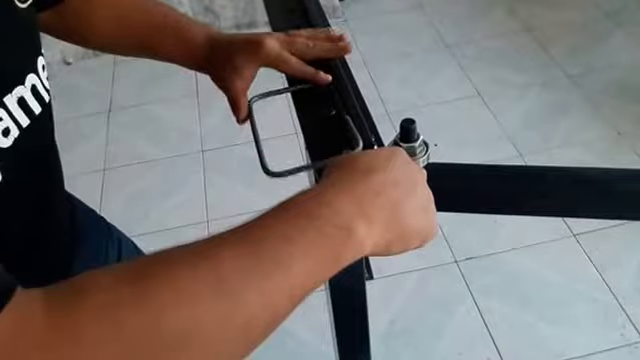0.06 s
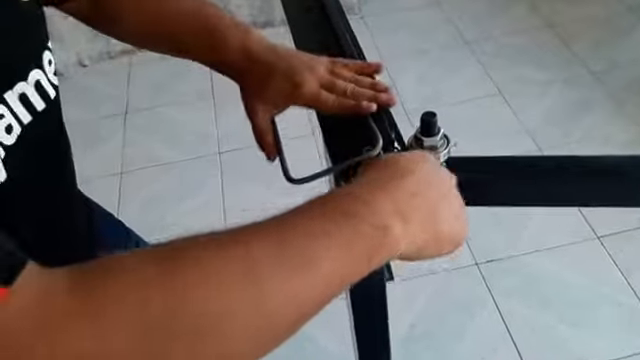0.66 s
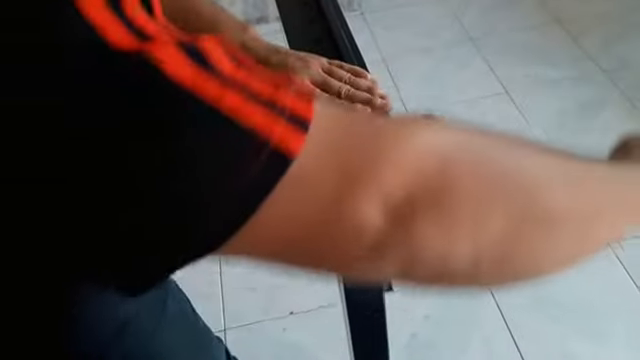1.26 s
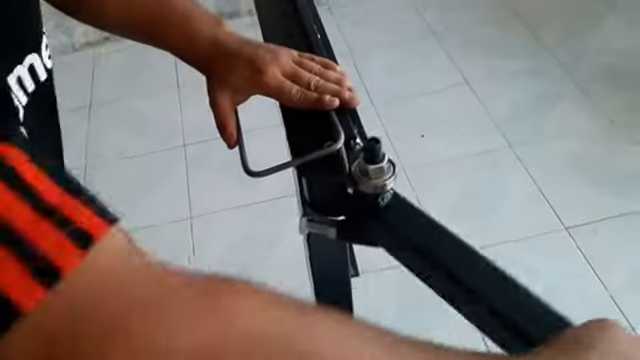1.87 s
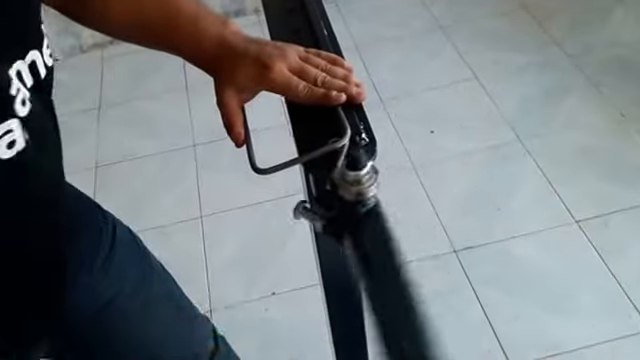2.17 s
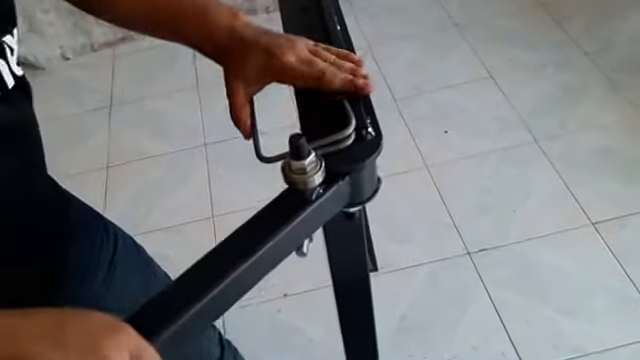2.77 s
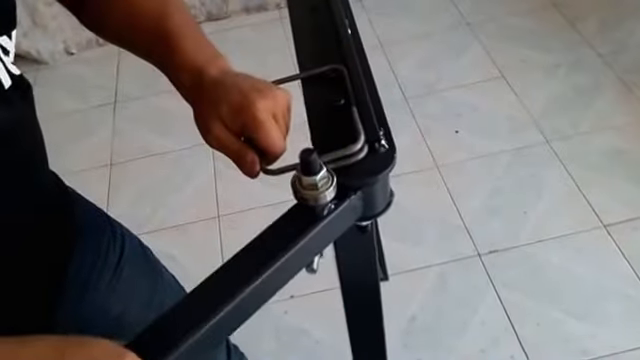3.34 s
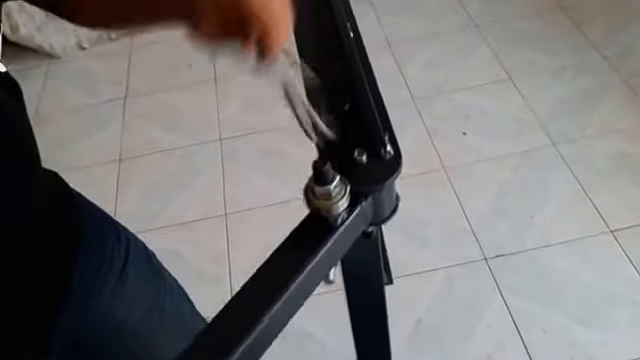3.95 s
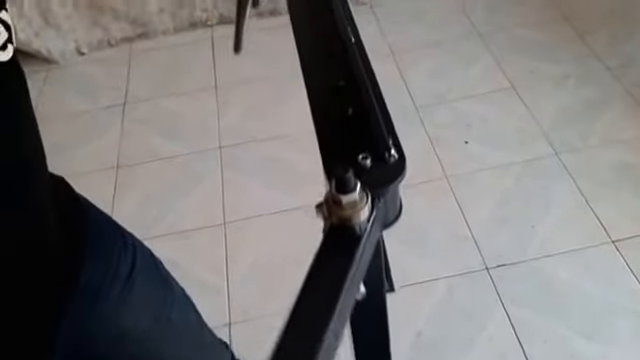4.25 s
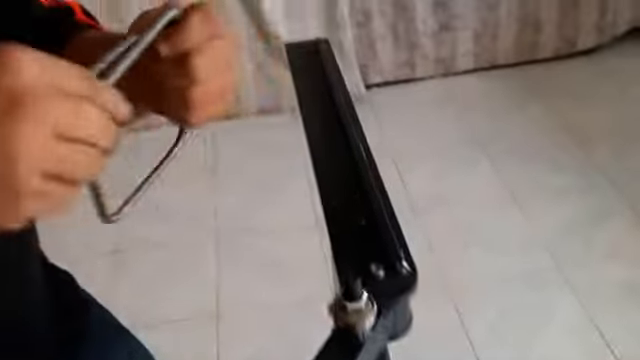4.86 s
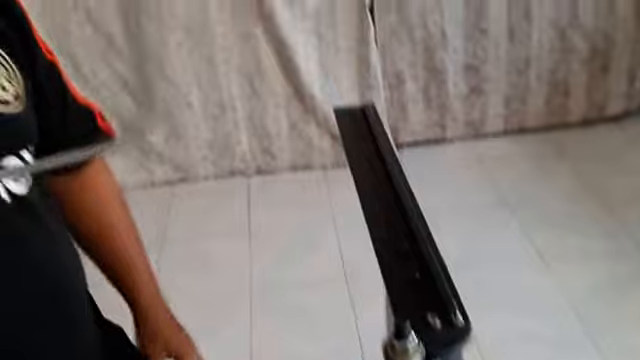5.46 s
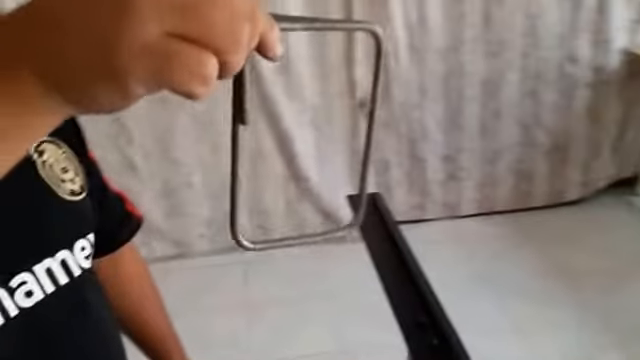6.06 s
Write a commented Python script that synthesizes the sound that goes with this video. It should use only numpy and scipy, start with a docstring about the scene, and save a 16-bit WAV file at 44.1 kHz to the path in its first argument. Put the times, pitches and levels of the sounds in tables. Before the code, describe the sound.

A steel rod is worked in a hand-lever bender, close and centred, in a quiet tiled room with a short echo. During the first second it clinks lightly with tiny squeaks and scrapes, and the lever knocks twice near 0.8 seconds. A firmer knock comes at 1.8, with faint ticks as the rod shifts and a short scrape near 2.7. At 3.4 the rod springs loose with a bright ring. A hard knock follows at 3.5, a ringing clank of the steel bench at 3.7, and the loudest knock at 3.9. The bent loop immediately jangles and scrapes free, ringing until about 4.3. Faint taps and scrapes trail off. One sharp, dry tick sounds at 5.5, and a hand rubs softly near the microphone around 5.8 to 6. A very faint low boom swells with the work.

```python
"""A steel rod is bent into a square loop on a hand-lever bender in a hard, tiled room.
First the rod clinks, squeaks and scrapes against the pins while the lever knocks in its pivot
and a low room boom swells with the work. The rod shifts as it bends, springs loose, and the steel
bench clanks. Near four seconds the finished loop is pulled free, jangling. One sharp tick follows,
and at the end a hand rubs close to the microphone as the loop is held up."""
import sys
import numpy as np
from scipy import signal
from scipy.fft import rfft, irfft, next_fast_len
from scipy.io import wavfile
from scipy.ndimage import map_coordinates

SR = 44100
rng = np.random.default_rng(int(sys.argv[2]) if len(sys.argv) > 2 else 0)


def int16_out(signal):
    """Quantize to a 16-bit WAV file."""
    q = np.round(np.clip(np.atleast_2d(signal).T, -1, 1) * 32767)
    wavfile.write(sys.argv[1], SR, q.astype(np.int16))


N = 269892
RING_SAMPLES = int(0.8 * SR)


def amp(db):
    """Decibels to gain."""
    return 10 ** (np.asarray(db) / 20)


def unit(x):
    """Scale to rms 1."""
    return x / np.sqrt(np.mean(x ** 2) + 1e-20)


def along(points, hz):
    """Read a curve of (Hz, value) points on a log axis."""
    f, v = np.transpose(points)
    return np.interp(np.log(hz + 1), np.log(f + 1), v)


def peaks(resonances, f):
    """Gain of (Hz, half-width in Hz, dB) resonances."""
    return sum(amp(db) / (1 + ((f - hz) / width) ** 2) for hz, width, db in resonances)


def wobble(rate):
    """A smooth random curve, rate knots a second."""
    return map_coordinates(rng.standard_normal(int(N * rate / SR) + 4), [np.arange(N) * rate / SR])


def filtered(x, response):
    """Equalise x with a gain that depends on frequency."""
    n = x.shape[-1]
    m = next_fast_len(n + 8192)
    return irfft(rfft(x, m) * response(np.fft.rfftfreq(m, 1 / SR)), m)[..., :n]


def noise(colour, size=N):
    """Noise of rms 1. Each row of a colour: frequency in Hz, level in dB."""
    return unit(filtered(rng.standard_normal(size), lambda hz: amp(along(colour, hz))))


def add(track, s, sound):
    """Mix a sound in at s seconds."""
    i = max(round(s * SR), 0)
    track[..., i:i + sound.shape[-1]] += sound[..., :N - i]


def swell(s, length, fade_db_per_s):
    """Vibration builds up for length seconds, then dies away."""
    t = np.arange(N) / SR - s
    return np.sqrt(np.clip(t / length, 0, 1)) * amp(-fade_db_per_s * np.maximum(t - length, 0))


def strokes(table, fade_db_per_s):
    """One envelope for each dB column of (start, length, dB, ..) rows; overlaps add in power."""
    power = np.array([swell(s, length, fade_db_per_s) ** 2 for s, length, *_ in table])
    return np.sqrt(amp(np.array(table)[:, 2:].T) ** 2 @ power)


def ambience():
    """Quiet room tone, almost alike in both ears."""
    # The room's hum and hiss. Each row: frequency in Hz, level in dB.
    colour = [(12, -28.5), (20, -7), (32, -36.5), (70, -2.5), (127, 2.5), (285, -5.5), (337, -6),
              (410, -7.5), (590, -10), (949, -11), (1060, -12.5), (4670, -30.5), (6720, -36), (7520, -38),
              (16000, -33.5)]
    mid, side = noise(colour), amp(-15) * noise(colour)
    return amp(-65) * np.array([mid + side, mid - side])


def room_tail(colour, t):
    """Diffuse ringing between the tiles; the treble dies first."""
    # Reverb time. Each row: frequency in Hz, t60 in seconds.
    reverb = [(200, 1), (1000, 0.69), (2200, 0.94), (6000, 0.67), (12000, 0.48)]
    hz, s, spectrum = signal.stft(noise(colour, size=len(t)), SR, nperseg=256)
    decay = amp(-60 * s / along(reverb, hz)[:, None])
    return signal.istft(spectrum * decay, SR, nperseg=256)[1][:len(t)]


def spread(x, side_db):
    """Wall reflections reach the two close microphone ports slightly differently."""
    t = np.arange(SR // 8) / SR
    walls = rng.standard_normal(len(t)) * np.exp(-t / 0.138)
    side = amp(side_db) * signal.fftconvolve(x, walls / np.linalg.norm(walls))[:N]
    side = filtered(side, lambda hz: amp(along([(100, 4), (1000, 0), (5000, -3), (8000, -20)], hz)))
    return np.array([x + side, x - side])


def ringing(modes, t):
    """Decaying modes, struck at a new spot each time; each has a weaker twin that beats with it."""
    hz, db, t60 = np.transpose(modes)[:, :, None]
    size = amp(db + rng.standard_normal(hz.shape))
    phase, twin_phase = rng.uniform(0, 2 * np.pi, (2,) + hz.shape)
    twin_hz = hz + 10 * rng.uniform(-1, 1, hz.shape)
    t = np.float32(t)
    sine = lambda f, start: np.sin(np.float32(2 * np.pi * f) * t + np.float32(start))
    pair = sine(hz, phase) + .4 * sine(twin_hz, twin_phase)
    decay = np.exp(np.maximum(np.float32(-np.log(1000) / t60) * t, -20))
    return (np.float32(size) * decay * pair).sum(0) / np.sqrt(np.sum(size ** 2) / 2)


def voiced(x, band_db, start):
    """Equalise a blow to its balance of bands, setting its level just after start."""
    # Presence, bass, body, brightness and air. Each row: lower and upper edge in Hz.
    bands = [(1600, 3300), (200, 700), (700, 1600), (3500, 7600), (8000, 15000)]
    first = round(start * SR)
    head, early = x[first:first + round(.014 * SR)], x[:round(.09 * SR)]
    hz, power = signal.periodogram(early, SR, window=("tukey", .1))
    power = power / power.sum() * np.mean(head ** 2)
    curve = []
    for (lo, hi), want_db in zip(bands, band_db):
        boost_db = want_db - 10 * np.log10(power[(hz > lo) & (hz < hi)].sum() + 1e-20)
        curve += [(lo * 1.15, boost_db), (hi / 1.15, boost_db)]
    return filtered(x, lambda f: amp(along(sorted(curve), f)))


def blows(hits, modes, colour, modes_db, tail_db, chatter, gain_db, bass_db, air_db):
    """Steel on steel: a brief chatter of contact, then the modes and the room ring out.
    Each hit: start in seconds, presence in dB, body and brightness in dB against it,
    contact time in seconds, ring-out in dB. Each mode: pitch in Hz, level in dB, t60 in seconds.
    The colour is the dense ringing around the modes. Each row: frequency in Hz, level in dB."""
    out, t = np.zeros(N), np.arange(RING_SAMPLES) / SR
    # While the parts touch, the modes are damped to broad humps that colour chatter and echo alike.
    grid = np.arange(0, SR / 2, 10)
    humps = np.max([peaks([(hz, 25 + hz / 150, db / 2)], grid) for hz, db, _ in modes], axis=0)
    for s, db, body_db, bright_db, contact, ring_db in hits:
        contact = max(contact, .002)
        burst = noise(colour, size=len(t)) * np.exp(-t / (chatter * contact + 0.0073))
        echo = amp(ring_db + tail_db) * room_tail(colour, t)
        dense = filtered(burst + echo, lambda f: .5 + 1.3 * np.interp(f, grid, humps))
        attack = 1 - np.exp(-(2 * t / contact) ** 2)
        blow = (dense + amp(ring_db + modes_db) * ringing(modes, t)) * attack
        balance_db = np.array([0, body_db + bass_db, body_db, bright_db, bright_db + air_db])
        add(out, s, voiced(blow, db + balance_db, contact / 2))
    return amp(gain_db) * out


def room_boom(gain_db, pitch_hz, rise_s):
    """One low room mode, slightly unsteady in pitch, swells with the work and dies away."""
    # Swells of the boom. Each row: start in seconds, relative level in dB.
    swells = [(-0.1, -67), (0.72, -73), (1.8, -62.5), (3.45, -70), (3.88, -60), (4.21, -68), (5.95, -71)]
    envelope, = strokes([(s, rise_s, db) for s, db in swells], fade_db_per_s=55.5)
    phase = 2 * np.pi * pitch_hz * np.arange(N) / SR + .6 * wobble(5.3)
    return amp(gain_db) * envelope * unit(np.sin(phase))


def hand_rub(rustle_db, squeak_db, rough_db, waver_db):
    """Skin drags in small slips: a dull rustle and thin resonances above it, which swell by turns."""
    # Hand strokes. Each row: start and length in seconds, rustle and squeak in relative dB.
    rubs = [(5.764, 0.058, -55.5, -64.5), (5.915, 0.048, -51.5, -61)]
    # The rustle. Each row: frequency in Hz, level in dB.
    colour = [(59, -37), (100, -17), (291, 3), (550, -4.5), (595, 1), (1340, -8.5), (2270, -6), (3540, -23),
              (3840, -25), (4220, -23), (4500, -31), (5850, -54), (9900, -120)]
    # The squeak. Each row: pitch and half-width in Hz, level in dB.
    resonances = [(2220, 35, 2), (2590, 55, -2), (3500, 50, -6), (4170, 35, -4), (5340, 130, -10),
                  (5730, 30, -9), (5890, 35, -13), (6680, 90, -9), (7400, 90, -7), (7600, 40, -10),
                  (7800, 30, -12), (8280, 40, -17), (9035, 35, -13), (9650, 90, -22), (10275, 45, -10),
                  (11585, 40, -18), (12480, 40, -24), (13500, 45, -22)]
    rustle, squeak = strokes(rubs, fade_db_per_s=68)
    slips = unit(amp(rough_db * wobble(220)))
    thin = np.zeros(N)
    for k in range(3):
        waver = amp(waver_db * wobble(11))
        thin += waver * filtered(slips * rng.standard_normal(N), lambda f: peaks(resonances[k::3], f))
    return amp(rustle_db) * rustle * slips * noise(colour) + amp(squeak_db) * squeak * unit(thin)


def sharp_tick(gain_db, wet_db):
    """A single dry tick and the room's answer."""
    # The tick's cue: start in seconds, relative level in dB.
    cues = [(5.478, -35.5)]
    # Its colour. Each row: frequency in Hz, level in dB.
    colour = [(120, -30), (400, -10), (1200, -1), (2300, 0), (3200, -9), (6600, -11), (8500, -25),
              (15000, -26)]
    out, t = np.zeros(N), np.arange(RING_SAMPLES) / SR
    for s, db in cues:
        tick = noise(colour, size=len(t)) * np.exp(-t / 0.0024)
        echo = room_tail(colour, t) * (1 - np.exp(-t / 0.013))
        add(out, s, amp(db + gain_db) * (tick + amp(wet_db) * echo))
    return out


def rod_scrapes(grind_db, hiss_db, rough_db, sing_db):
    """The rod drags over the pins, catching unevenly, and sings at its resonances."""
    # Drags. Each row: start and length in seconds, grind and hiss in relative dB.
    drags = [(0.28, 0.045, -61, -75), (1.07, 0.033, -56, -71), (2.475, 0.018, -68, -66),
             (2.686, 0.068, -52.5, -58), (3.045, 0.02, -60.5, -60), (3.17, 0.018, -62, -65.5),
             (4.13, 0.088, -51, -48), (4.5, 0.026, -58, -82), (4.66, 0.086, -59.5, -93),
             (4.778, 0.027, -57, -62), (5.2, .04, -65, -76.5)]
    # Low grind and high hiss. Each row: frequency in Hz, level in dB.
    grind_colour = [(290, -30.5), (500, -8.5), (888, -2), (1070, -13), (2190, -2.5), (2370, -11),
                    (2590, -5), (4000, -34), (5200, -61), (8800, -120)]
    hiss_colour = [(1940, -39), (3300, -17.5), (4500, -12.5), (5100, -15.5), (6690, -9), (7540, -13.5),
                   (8050, -22), (15100, -25.5), (16000, -37.5)]
    # The rod's resonances. Each row: pitch and half-width in Hz, level in dB.
    singing = [(956, 10, -7), (2415, 14, -1.5), (5210, 88, 3), (6820, 90, -10.5)]
    grind, hiss = strokes(drags, fade_db_per_s=90.5)
    catch = unit(amp(rough_db * wobble(170)))
    drag = amp(grind_db) * grind * noise(grind_colour) + amp(hiss_db) * hiss * noise(hiss_colour)
    return filtered(catch * drag, lambda f: 1 + amp(sing_db) * peaks(singing, f))


def rod_squeaks(gain_db):
    """A slip on a pin excites one damped resonance of the ribbed rod; longer slips sing purer."""
    # Slips. Each row: start in seconds, relative level in dB, length in seconds, pitch in Hz.
    slips = [(0.139, -46, .016, 2620), (0.258, -48, .02, 2600), (0.425, -45, .014, 2550),
             (0.47, -52, .07, 1530), (0.731, -51, .016, 2600), (0.886, -49, .01, 2560),
             (1.064, -58, .018, 2560), (2.315, -54, .04, 2260), (3.18, -66, .1, 2260),
             (3.933, -32, .016, 2750)]
    out, t = np.zeros(N), np.arange(SR // 2) / SR
    for s, db, length, hz in slips:
        width = 2.5 / length + 30
        tone = unit(filtered(rng.standard_normal(len(t)), lambda f: peaks([(hz, width, 0)], f)))
        rise = 2 * t / length
        add(out, s, amp(db + gain_db) * tone * rise * np.exp(1 - rise))
    return out


def lever_knocks(wet_db):
    """The lever takes up the play in its pivot: a few well-damped modes and a little room."""
    # Each row: time in seconds, level in dB, pitch in Hz, longest t60 the grip allows in seconds.
    knocks = [(0.795, -32.5, 942, 0.12), (0.886, -32, 981, 0.106), (1.318, -40.5, 954, 0.21),
              (1.801, -26, 893, 0.085), (2.435, -43, 980, 0.19), (3.536, -20, 936, 0.028),
              (3.894, -15, 967, 0.019)]
    # The pivot's modes. Each row: multiple of the pitch, level in dB, t60 in seconds.
    pivot = [(1, -5, 0.45), (1.03, 3, 0.01), (1.29, -11, 0.12), (1.45, -1, 0.024), (2.1, 1, 0.01),
             (2.35, -15.5, 0.13)]
    echo_colour = [(300, -35.0), (750, -11.5), (930, -0.5), (1100, -15.5), (1350, -10.5),
                   (2200, -19.5), (4000, -44.5)]
    out, t = np.zeros(N), np.arange(RING_SAMPLES) / SR
    attack = 1 - np.exp(-(t / 0.002) ** 2)
    for s, db, pitch, ring in knocks:
        modes = [(ratio * pitch, level, min(t60, ring)) for ratio, level, t60 in pivot]
        echo = amp(wet_db) * np.sqrt(ring) * room_tail(echo_colour, t)  # long rings feed the room more
        add(out, s - .001, amp(db) * (ringing(modes, t) + echo) * attack)
    return out


def bench_clanks():
    """A faint ring as the rod scrapes, then one loud clank of the steel bench."""
    # The steel channel's cues, modes and dense ringing; rows as in blows().
    cues = [(2.685, -60.5, 1, -12, .004, -5), (3.691, -28, -3.5, -14, .005, -5)]
    modes = [(260, -23, 0.8), (299, -18, 0.57), (333, -13, 0.5), (379, -17, 0.58), (425, -13, 0.32),
             (583, -9, 0.53), (807, -11, 0.8), (830, -11, 0.55), (1116, -4, 0.4), (1139, -3, 0.52),
             (1180, -2, 0.31), (1202, -9, 0.59), (1223, -13, 0.8), (1240, -11, 0.79), (1608, -11, 0.52),
             (1704, -12, 0.8), (1756, -15, 0.8), (1785, -8, 0.79), (1815, -12, 0.67), (1965, -8, 0.8),
             (2257, -6, 0.78), (2289, -12, 0.8), (2354, -1, 0.35), (2389, 0, 0.39), (2498, -7, 0.25),
             (3163, -17, 0.8), (3302, -11, 0.38), (3714, -19, 0.45), (5111, -18, 0.45), (5161, -14, 0.33)]
    colour = [(120, -23), (250, -15.5), (340, -16), (480, -11.5), (700, -9.5), (1150, -5), (1450, -11),
              (2300, -8), (3200, -12.5), (4300, -16), (5200, -17), (7200, -23), (8200, -36.5),
              (16000, -58.5)]
    return blows(cues, modes, colour, modes_db=-2, tail_db=-4.5, chatter=1.2,
                 gain_db=0.5, bass_db=-7, air_db=-22.5)


def rod_clinks():
    """The rod clinks under the hand as it is set against the pins."""
    # The held rod's hits, modes and dense ringing; rows as in blows().
    hits = [(0.001, -48, -2, -5, 0.0041, -3), (0.141, -51, -6.5, -14.5, 0.0032, 7),
            (0.256, -48.5, -7.5, -7.5, 0.011, 31), (0.36, -47.5, -3.5, -8.5, 0.0022, 1.5),
            (0.423, -42, -5.5, -11.5, 0.0067, -7.5), (0.729, -56, -1.5, -9, 0.002, 15),
            (0.854, -49.5, -3.5, -13.5, 0.0027, -9), (0.884, -51, -2.5, -13.5, 0.0018, -3),
            (1.063, -67, -17, -12, 0.0052, -21)]
    modes = [(842, -9, .7), (890, -8, .7), (910, -6, .7), (960, -7, .7), (1479, 0, .75), (1500, -6, .7),
             (1560, -4, .7), (1623, -6, .6), (1690, -5, .7), (1815, -7, .6), (2089, -6, .6), (2109, -6, .6),
             (2228, 0, .7), (2254, -5, .6), (2483, -6, .4), (2571, -3, .4), (2589, -4, .4), (2975, -10, .4),
             (3767, -18, .3)]
    colour = [(71, -35), (120, -4.5), (167, -18), (524, -10.5), (569, -20), (617, -5.5), (911, -10),
              (1070, -1), (1520, -8.5), (1940, -8.5), (2240, -5.5), (3520, -15), (7200, -28.5), (7980, -45),
              (16000, -66)]
    return blows(hits, modes, colour, modes_db=-3, tail_db=-2, chatter=3.2,
                 gain_db=-2.5, bass_db=-9, air_db=-22)


def rod_bends():
    """Wedged by the lever, the rod shifts on the pins as it bends."""
    # The wedged rod's hits, modes and dense ringing; rows as in blows().
    hits = [(1.72, -44.5, -3.5, -6.5, 0.0014, -1.5), (1.8, -45.5, -3.5, -11.5, 0.0017, 3.5),
            (1.865, -59, 5, -10, 0.0072, 14), (1.942, -51, -7.5, -5, 0.021, 1.5),
            (2.15, -60, -1.5, -8, 0.0082, 0.5), (2.311, -56.5, -1.5, -11.5, 0.0058, -1),
            (2.474, -82, 0, 9, 0.0042, -17)]
    modes = [(857, -6, .5), (885, -3, .6), (908, -3, .6), (957, -9, .5), (1153, -4, .4), (1244, -6, .5),
             (1300, -5, .5), (1475, -9, .5), (1820, -4, .55), (1957, -4, .6), (1985, -6, .55),
             (2080, -7, .55), (2260, -6, .5), (2523, -8, .4), (2589, -8, .4), (4592, -17, .35),
             (5175, -7, .3), (6708, -17, .3), (10175, -21, .5), (10610, -15, .2)]
    colour = [(71, -24), (120, -17.5), (410, -28), (742, -12.5), (892, -21), (1010, -8), (1120, -10),
              (1680, -7), (1980, -10), (3740, -8), (5300, -6), (7350, -4.5), (8140, -13.5), (10400, -18),
              (16000, -29.5)]
    return blows(hits, modes, colour, modes_db=-13.5, tail_db=-6, chatter=2.4,
                 gain_db=1, bass_db=-12.5, air_db=-10)


def rod_springs():
    """The rod springs loose and rings freely."""
    # The sprung rod's hits, modes and dense ringing; rows as in blows().
    hits = [(3.355, -31, -12.5, -1.5, 0.011, -1.5), (3.64, -56.5, -1.5, 3, 0.0052, -12),
            (3.661, -41.5, -1.5, -6, 0.0018, -8)]
    modes = [(686, -19, 0.8), (857, -16, 0.8), (887, -16, 0.8), (904, -17, 0.8), (1323, -17, 0.8),
             (1497, -16, 0.8), (1916, -8, 0.68), (1945, -2, 0.59), (1962, -2, 0.78), (2095, -6, 0.8),
             (2159, -10, 0.69), (2208, -7, 0.58), (2262, -10, 0.64), (2524, -7, 0.55), (2552, -10, 0.49),
             (2583, 0, 0.42), (2650, -12, 0.63), (2778, -13, 0.68), (2973, -12, 0.53), (3572, -16, 0.74),
             (4089, -14, 0.6), (4274, -18, 0.6), (4845, -15, 0.55), (4983, -9, 0.4), (5173, 0, 0.42),
             (5587, -18, 0.6), (6047, -12, 0.37), (6288, -5, 0.35), (6925, -15, 0.43), (8705, -20, 0.42)]
    colour = [(71, -50.5), (120, -20.5), (222, -38), (321, -10.5), (362, -31), (557, -18.5), (643, -27.5),
              (698, -17), (1400, -6.5), (2020, -7.5), (3110, -9.5), (5300, -10), (7820, -13.5), (9020, -21),
              (16000, -33)]
    return blows(hits, modes, colour, modes_db=-3, tail_db=-3, chatter=1,
                 gain_db=-0.5, bass_db=-7, air_db=-13)


def loop_jangles():
    """The finished loop jangles as it is pulled free."""
    # The loop's hits, modes and dense ringing; rows as in blows().
    hits = [(3.931, -30, -8.5, -8, 0.0052, -0.5), (4.047, -31, -12.5, -4, 0.009, -4.5),
            (4.072, -28, -16.5, -2, 0.008, -5.5), (4.205, -44, -4.5, -11, 0.0016, 3.5),
            (4.468, -54, 0, -22, 0.0017, 4), (4.639, -60, 3.5, -22, 0.0059, -6),
            (5.076, -62, 0, -27, 0.003, -9.5), (5.236, -75, 9, -18.5, 0.003, -4)]
    modes = [(1686, -8, 0.78), (1814, -1, 0.58), (2038, -5, 0.8), (2069, -2, 0.8), (2103, -4, 0.8),
             (2123, -5, 0.8), (2149, -2, 0.8), (2223, -4, 0.59), (2258, 0, 0.8), (2339, -5, 0.66),
             (2560, -1, 0.45), (2702, -1, 0.49), (2775, -2, 0.42), (2899, -7, 0.76), (2929, -2, 0.6),
             (3005, -6, 0.79), (4338, -7, 0.52), (4628, -8, 0.51), (5000, -9, 0.59), (5111, -6, 0.56),
             (5170, -9, 0.49), (5476, -7, 0.52), (5792, -8, 0.57), (5888, -5, 0.45), (5913, -11, 0.57),
             (6473, -8, 0.44), (6738, -4, 0.54), (6957, -4, 0.51), (7079, -7, 0.43), (7288, -10, 0.46)]
    colour = [(71, -53), (120, -25), (308, -20.5), (580, -11.5), (684, -14), (892, -12), (1290, -11),
              (2110, -7), (2990, -12.5), (3380, -9), (4230, -7), (6910, -9), (7980, -10.5), (9020, -9.5),
              (16000, -43.5)]
    return blows(hits, modes, colour, modes_db=-6.5, tail_db=-6, chatter=1.14,
                 gain_db=-3, bass_db=-11, air_db=-15.5)


def scene():
    """The bender at work, straight ahead, over the room tone."""
    work = rod_clinks() + rod_bends() + rod_springs() + bench_clanks() + loop_jangles()
    work += lever_knocks(wet_db=-13.5)
    work += sharp_tick(gain_db=-5.5, wet_db=-14.5)
    work += rod_squeaks(gain_db=-2)
    work += rod_scrapes(grind_db=-4, hiss_db=-11, rough_db=1, sing_db=3.5)
    work += hand_rub(rustle_db=1.5, squeak_db=6, rough_db=1, waver_db=2)
    work += room_boom(gain_db=3, pitch_hz=61, rise_s=0.075)
    return spread(work, side_db=-24) + ambience()


def record(dry):
    """The microphone's colour, with nothing above 15.8 kHz."""
    # A narrow dip in the treble. Each row: frequency in Hz, gain in dB.
    treble_dip = [(7300, 0), (7650, -1), (7950, -8), (8300, -1), (8700, 0)]
    return filtered(dry, lambda hz: amp(along(treble_dip, hz)) * (hz < 15800))


dry = scene()
out = record(dry)
int16_out(out)
```